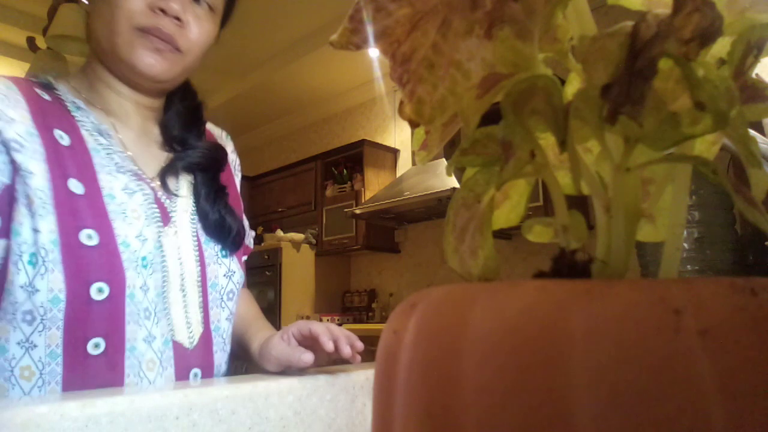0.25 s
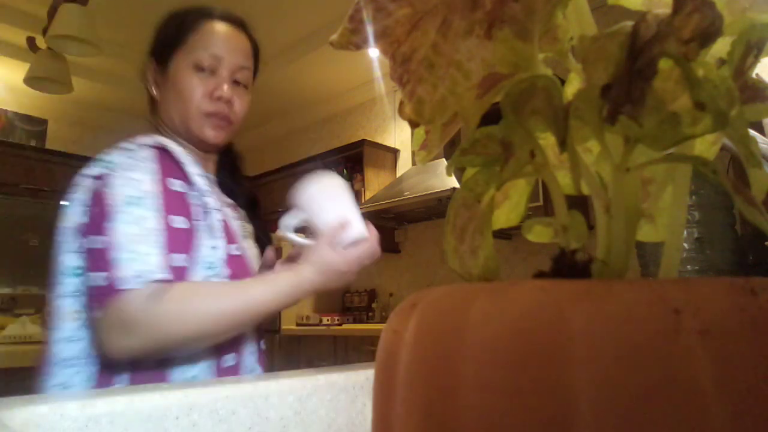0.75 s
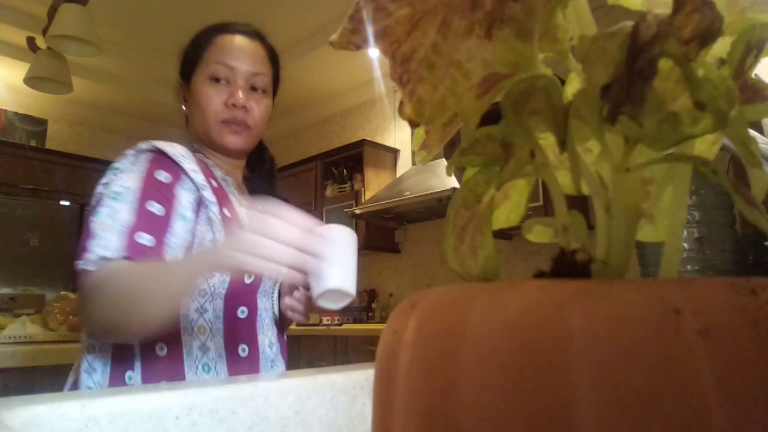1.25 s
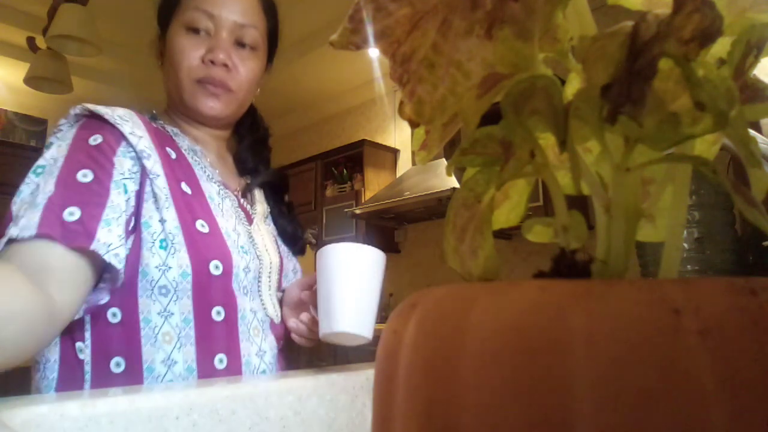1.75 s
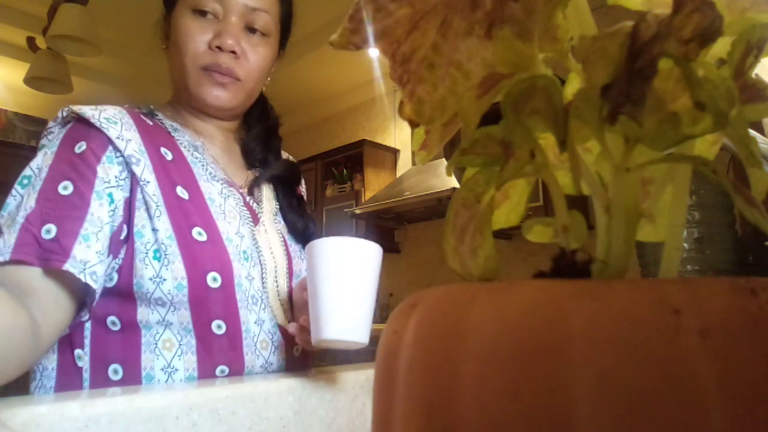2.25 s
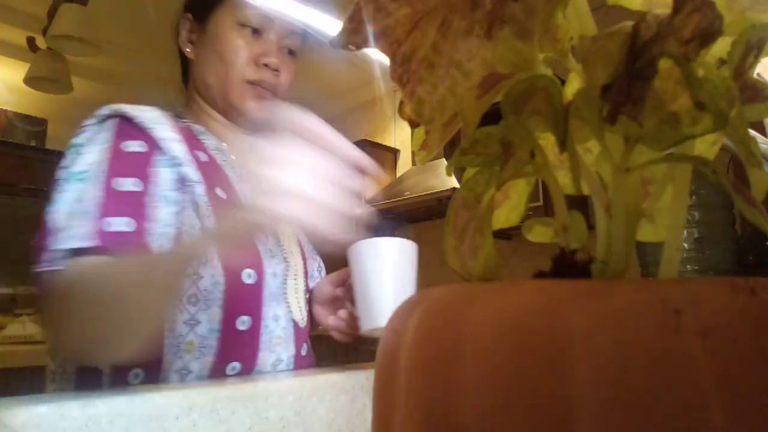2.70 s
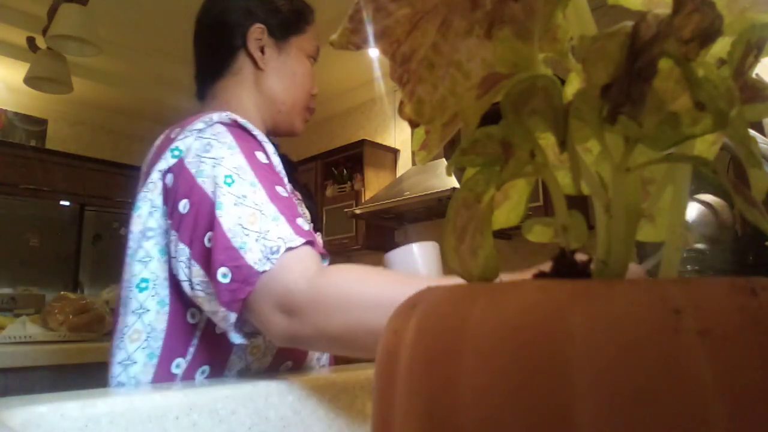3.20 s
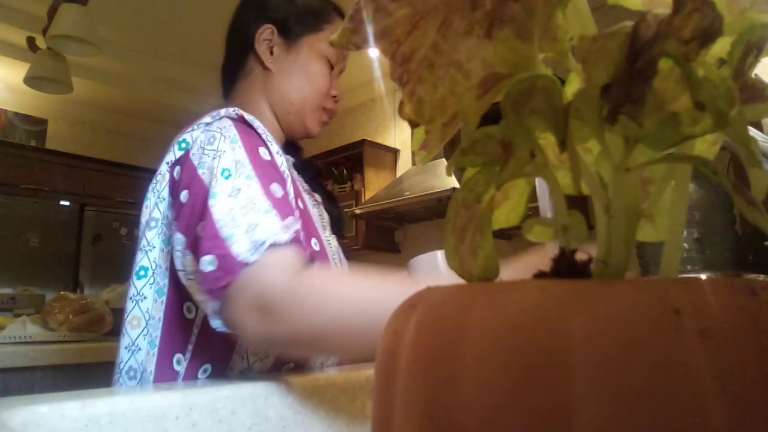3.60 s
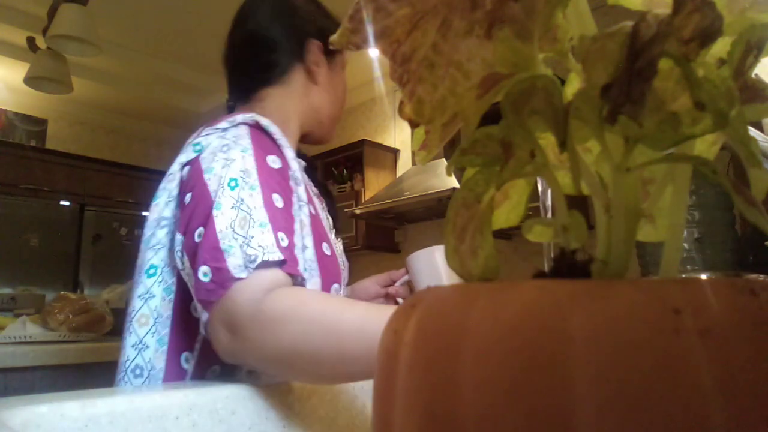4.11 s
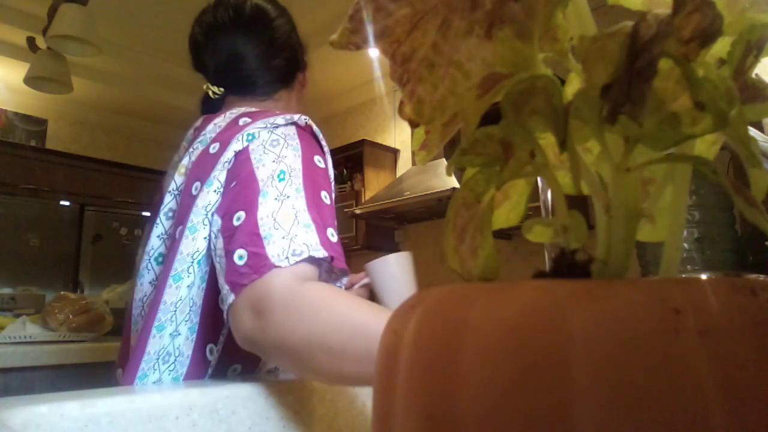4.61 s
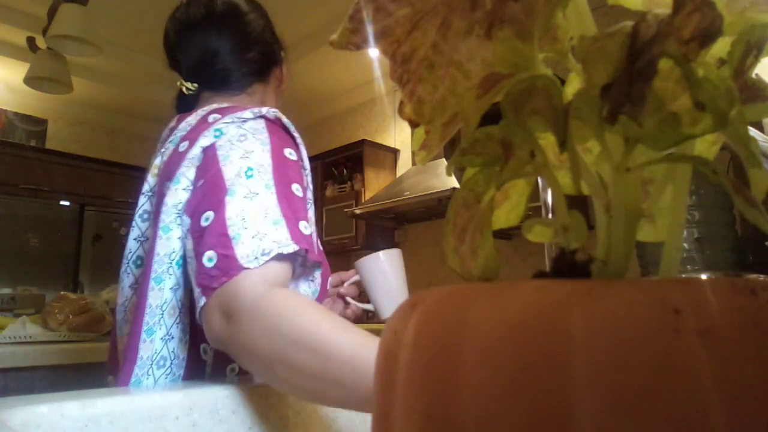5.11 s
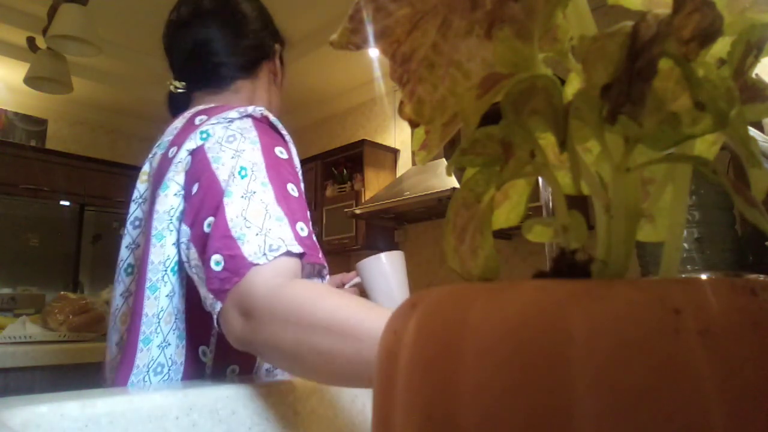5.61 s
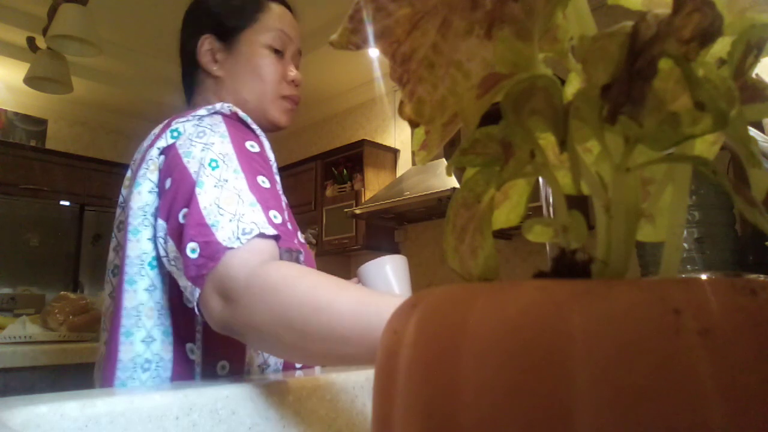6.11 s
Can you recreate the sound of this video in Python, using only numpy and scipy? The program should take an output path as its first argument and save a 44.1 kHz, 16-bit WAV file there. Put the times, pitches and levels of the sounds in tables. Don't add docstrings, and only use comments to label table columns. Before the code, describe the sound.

A quiet kitchen heard close to the counter, with a faint low fridge hum pulsing about five times a second and thin duct air. At 0 s the rounded clunk of a mug just set down dies away within half a second, leaving only hum until about 1.45 s. Then teaspoons chatter against mugs: clipped, gripped metallic clicks to 1.9 s, then louder, freer, brighter ringing, strongest around 2.0-2.15 s, with last clinks near 2.27 s and a short shimmering tail. From 2.5 s soft rubbing begins. At 3.05-3.2 s come low cupboard bumps and dull tub knocks with a slide; firmer knocks land at 3.4 and 3.67 s, with a brief droning drag near 3.55 s. From 3.7 s a packet crinkles, snaps and swishes in irregular squeezes, with scattered dull knocks and counter rubs, notably near 5.63 s, continuing to the end at 6.3 s.

```python
import sys
import numpy as np
from scipy import signal
from scipy.fft import rfft, irfft
from scipy.io import wavfile

SR = 44100
rng = np.random.default_rng(int(sys.argv[2]) if len(sys.argv) > 2 else 0)


def wav_out(sig):
    wavfile.write(sys.argv[1], SR, np.round(np.clip(np.atleast_2d(sig).T, -1, 1) * 32767).astype(np.int16))


def amplitude_ratio(level_db):
    exponent = np.asarray(level_db, float) / 20
    return 10 ** exponent


N = 280035
HZ = np.maximum(np.fft.rfftfreq(N, 1 / SR), 1)


def rms_one(x):
    return x / np.sqrt(np.mean(x ** 2) + 1e-20)


def filtered(x, order, hz, kind):
    return signal.sosfilt(signal.butter(order, hz, kind, fs=SR, output="sos"), x)


def in_time(rows):
    s, *columns = np.transpose(rows)
    t = np.arange(N) / SR
    outside = np.maximum(s[0] - t, 0) + np.maximum(t - s[-1], 0)
    return [np.interp(t, s, c) - 900 * outside for c in columns]


def at_hz(points, hz):
    point_hz, value = np.transpose(points)
    return np.interp(np.log(hz), np.log(point_hz), value)


def coloured(x, spectrum):
    return rms_one(irfft(rfft(x) * amplitude_ratio(at_hz(spectrum, HZ)), N))


def drift(rate):
    knots = rng.standard_normal(400)
    return np.interp(np.arange(N) * rate / SR, np.arange(400), knots)


def random_hits(per_s, spread_db):
    sizes = amplitude_ratio(spread_db * np.minimum(rng.exponential(1, N), 3))
    return sizes * (rng.random(N) < per_s / SR)


def grains(per_s, spread_db):
    flare = signal.lfilter([1], [1, -np.exp(-1 / (0.0025 * SR))], random_hits(per_s, spread_db))
    return rng.standard_normal(N) * (1 + 0.96 * flare)


def patchy(x, patchy_db, rate):
    spectrum, out = rfft(x), 0
    for octave in np.arange(15, 43) / 3:
        band = spectrum * np.clip(1 - 3 * np.abs(np.log2(HZ) - octave), 0, 1)
        if np.any(np.abs(band) > 1):
            flicker = drift(rate) + 0.28 * drift(rate / 3)
            out = out + amplitude_ratio(patchy_db * flicker) * irfft(band, N)
    return rms_one(out)


def add(out, s, x):
    i = round(s * SR)
    out[i:i + len(x)] += x[:N - i]


def struck(modes, stretch, luck=np.zeros(40), scatter_db=0):
    hz, level_db, t60 = np.transpose(modes)[:, :, None]
    t, luck = np.arange(SR // 2) / SR, luck[:len(modes), None]
    hz = hz * (1 + 0.004 * luck[::-1] / stretch)
    decay = amplitude_ratio(level_db + scatter_db * luck - 60 * t / (t60 * stretch))
    build = 1 - np.exp(-hz * t / 0.49)
    return np.sum(decay * np.sin(2 * np.pi * hz * t) * build, axis=0)


def puff(source, s, t60, rise=0.00075):
    t = np.arange(SR // 5) / SR
    snatch = np.resize(source[round(s * SR):], len(t))
    return snatch * amplitude_ratio(-60 * t / t60) * (1 - np.exp(-t / rise))


def chatter(ring, s, white, t60, first=2.4):
    t = np.arange(SR // 16) / SR
    scuff = np.resize(white[round(s * SR):], len(t)) * amplitude_ratio(-60 * (t / t60) ** 2)
    scuff[0] = first * np.sqrt(t60 * SR / 100)
    return signal.fftconvolve(ring, scuff / np.sqrt(np.sum(scuff ** 2)))


def gestures(rows, fall_db_per_s):
    t, main, second = np.arange(N) / SR, 0, 0
    for s, db, rise, extra_db in rows:
        below_db = np.where(t < s, 15 * (s - t) / rise, fall_db_per_s * (t - s))
        gain = amplitude_ratio(db - below_db)
        main = np.maximum(main, gain)
        second = np.maximum(second, amplitude_ratio(extra_db) * gain)
    return main, second


# frequency in Hz, level in dB per Hz.
AIR = [(15, -48.5), (30, -17.5), (45, -18.5), (80, -8), (124, -3.5), (252, -10.5), (525, -15), (1160, -19),
       (1690, -26), (5750, -34.5), (7970, -43), (15300, -44), (16600, -47)]
# frequency in Hz, width in Hz, lift in dB.
WHISTLES = [(549, 36, 18), (1150.5, 44, 16.5)]
# time in seconds, low whistle in dB, high whistle in dB.
DRAUGHT = [(0, -26.5, -29.5), (.8, -21, -21.5), (0.901, -16.5, 2), (1.101, -16, -6.5), (1.4, 3, -8.5),
           (2.4, -2.5, -2.5), (2.9, -5.5, -1.5), (3.6, -2, -2.5), (4.201, -3, -7.5), (4.6, -1, -8),
           (5.2, -7, -1), (5.6, -3.5, -9.5), (6.35, -4.5, -6.5)]
# time in seconds, hum level in dB.
LOAD = [(0, -22), (.2, -6), (.6, 4.5), (1.0, -2.5), (1.3, -0.5), (1.9, 3.5), (2.3, 1.5), (2.7, -5.5),
        (3.3, 5.5), (3.9, -8), (4.2, -3.5), (4.5, 5.5), (4.8, 1), (5.1, -3), (5.4, 3), (5.8, 0), (6.1, 5),
        (6.35, 3)]
AIR_DB, HUM_DB, WEAK_DB = -67.5, -68.5, -6
MAINS_HZ, BEATS_PER_S, IN_STEP_S = 120, 4.74, 1.97
WEAK_EVERY_S, WEAK_AT_S = 6 / BEATS_PER_S, 0.93


def background():
    air = coloured(rng.standard_normal(N), AIR)
    whistles = 0
    for (hz, width, lift_db), draught_db in zip(WHISTLES, in_time(DRAUGHT)):
        lift = amplitude_ratio(lift_db) / (1 + (2 * (HZ - hz) / width) ** 2)
        whistles = whistles + amplitude_ratio(draught_db) * irfft(rfft(air) * lift, N)
    air = patchy(air + whistles, patchy_db=0, rate=13)
    t = np.arange(N) / SR
    turns = 2 * np.pi * (t - IN_STEP_S)
    weak = np.cos(np.pi * (t - WEAK_AT_S) / WEAK_EVERY_S) ** 10
    tones = np.sin(MAINS_HZ * turns) + np.sin((MAINS_HZ - BEATS_PER_S) * turns)
    return amplitude_ratio(AIR_DB) * air + amplitude_ratio(HUM_DB + WEAK_DB * weak + in_time(LOAD)[0]) * tones


# frequency in Hz, level in dB, t60 in seconds.
CLUNK = [(341, -4, 0.29), (379, -5, 0.59), (716, -6, 0.27), (790, -12, 0.52), (1058, -4.5, 0.16),
         (1430, -5.5, 0.12), (1570, -5.5, 0.11), (2030, -20, 0.32), (1960, -26.5, 0.74), (2240, -30, 0.72),
         (2900, -34, .4)]
# frequency in Hz, level in dB per Hz.
CLUNK_TAIL = [(59, -30), (100, -15), (256, -17.5), (367, 1), (410, -13.5), (976, -16.5), (1050, -13),
              (6410, -40.5), (9000, -66), (11700, -100), (19800, -120)]
CLUNK_DB, CLUNK_TAIL_DB, CLUNK_T60_S = -34, -41, 0.52


def clunk():
    decay_db = -60 * np.arange(N) / SR / CLUNK_T60_S
    out = amplitude_ratio(CLUNK_TAIL_DB + decay_db) * coloured(rng.standard_normal(N), CLUNK_TAIL)
    add(out, 0, amplitude_ratio(CLUNK_DB) * struck(CLUNK, 0.82))
    return out


# frequency in Hz, level in dB, t60 in seconds.
LOW_RING = [(2870, -13.5, 0.06), (2620, 3.5, 0.028), (2550, -6, 0.038)]
MIDDLE_RING = [(4100, -3.5, 0.034), (4200, 6, 0.024), (4290, 1, 0.065), (4300, -6.5, .03)]
MAIN_RING = [(5530, -10.5, 0.052), (6000, -8.5, 0.04), (5919, 6, 0.092), (6010, 1.5, 0.04),
             (5710, -10, .04), (6074, 7, 0.048), (6690, -2.5, 0.057)]
SIZZLE = [(10130, -8.5, 0.05), (10380, -4.5, 0.064), (10940, -0.5, 0.03), (12200, -8.5, 0.044),
          (11500, -6.5, 0.065), (12720, -2, 0.026), (13600, -9, .03), (14520, -3.5, .06),
          (15100, -0.5, .03), (15400, -3.5, 0.032), (15740, -9.5, 0.051)]
# frequency in Hz, level in dB, t60 in seconds.
RING_OUT = [(2660, -34, 0.71), (2580, -34.5, 0.68), (4250, -39, 0.67), (5420, -33.5, .7),
            (5620, -36.5, .45), (5700, -38.5, .45), (6140, -31, 0.7), (5770, -33, 1), (6331, -37, .5),
            (6875, -35, 0.7), (4270, -38.5, 0.5), (14525, -43, .2)]
# frequency in Hz, level in dB per Hz.
CRACK = [(180, -60.5), (520, -33), (700, -43.5), (1000, -22.5), (1890, -14), (3180, -0.5), (4160, -21.5),
         (4750, -6.5), (6110, 3), (8260, -29.5), (10600, -12), (13400, -20), (15400, -7), (16400, -31)]
# frequency in Hz, level in dB per Hz.
THUD = [(150, -20), (300, -6.5), (520, -5), (680, -8.5), (900, 1.5), (1300, -2), (1700, -6), (2200, -4.5),
        (3000, -19.5), (5000, -61)]
# start in seconds, peak in dB,
# spot from -1 (mug) to 1 (spoon), scuff t60 in seconds.
GRIPPED = [(1.4475, -34, .3, .01), (1.4507, -23.5, 0.4, 0.024), (1.466, -42.5, 1.23, 0.053),
           (1.4965, -21, 0.3, 0.016), (1.5494, -16, 0.31, .012), (1.628, -14.5, 0.3, 0.025),
           (1.6385, -23.5, 1.34, 0.032), (1.6544, -40.5, 0.61, 0.011), (1.704, -19, .2, 0.031),
           (1.747, -46.5, 0.1, .01), (1.7611, -18, 0.68, 0.036), (1.7893, -25, -0.42, 0.057),
           (1.812, -45, -.1, 0.011), (1.8386, -22, 0.036, 0.016), (1.847, -23, -0.2, 0.02),
           (1.856, -23.5, -.2, .05), (1.8845, -25.5, 0.27, 0.023), (1.906, -29.5, -1.3, 0.12)]
# start in seconds, peak in dB,
# spot from -1 (mug) to 1 (spoon), scuff t60 in seconds.
LOOSE = [(1.9554, -23, -0.05, 0.11), (1.9907, -20.5, 0.35, 0.047), (1.9997, -18.5, -1.5, 0.019),
         (2.0035, -18.5, -0.54, 0.024), (2.0251, -9.5, -1.3, 0.064), (2.0344, -14, -0.9, 0.011),
         (2.0414, -34, -.5, 0.022), (2.0565, -19, -1, 0.074), (2.1042, -18.5, 0.05, 0.013),
         (2.1117, -10, 0.35, 0.018), (2.1292, -24, 0.9, 0.043), (2.138, -22.5, 0.28, 0.028),
         (2.255, -26.5, -0.28, 0.048), (2.2711, -25.5, 0.5, 0.046)]
# start in
# seconds, peak in dB, frequency in Hz, t60 in seconds.
PINGS = [(1.5505, -5.5, 4200, 0.022), (1.5496, -19, 3800, 0.02), (1.5491, -19.5, 4650, 0.014),
         (1.552, -24.5, 6250, 0.022), (1.554, -30.5, 7260, 0.026), (1.55, -32, 2600, 0.029),
         (1.549, -33, 1310, .02), (1.551, -39, 550, 0.033), (1.56, -43.5, 4200, 0.12),
         (1.6385, -19, 3950, 0.022), (1.707, -32.5, 4140, 0.062), (2.0326, -8.5, 5940, .03),
         (2.04, -15.5, 5950, .06), (1.628, -25, 15400, .03), (1.635, -19.5, 6460, 0.02),
         (1.655, -33.5, 15200, 0.059), (1.706, -36.5, 12500, 0.051), (1.7594, -18, 4440, 0.037),
         (1.786, -32, 4640, 0.064), (1.81, -32.5, 4480, .04), (1.813, -46.5, 1430, 0.04),
         (1.842, -32, 2840, .04), (1.859, -36, 2890, .06), (1.957, -29.5, 6330, .04),
         (1.992, -41, 1620, .03), (2.026, -39, 290, 0.05), (2.028, -32.5, 14520, .15),
         (2.106, -29.5, 14520, .25), (2.0331, -17, 2586, 0.079), (2.058, -28, 6900, 0.074),
         (2.056, -32.5, 7540, .05), (2.057, -32, 5130, .08), (2.1115, -15, 4185, .06),
         (2.111, -19, 6920, 0.12), (2.112, -44, 1518, .06), (2.1249, -18, 4154, .06),
         (2.0034, -16, 5980, 0.028), (1.496, -31, 2660, .015), (3.053, -43, 2900, 0.031),
         (3.053, -52.5, 7420, .03), (3.112, -58, 4200, .03), (3.301, -60.5, 6060, .3),
         (3.404, -67, 7300, 0.37), (3.41, -60, 6100, 0.24), (3.565, -53.5, 7230, .12),
         (3.566, -57.5, 6100, 0.13), (3.67, -28, 3240, .025), (3.673, -33, 5100, 0.026),
         (3.71, -43, 6100, .03), (3.885, -57, 5960, .02)]
# time in seconds, level in dB.
JINGLE = [
    (1.44, -67.5),
    (1.498, -88.5),
    (1.618, -60.5),
    (1.856, -51),
    (1.964, -48),
    (2.14, -32.5),
    (2.3, -42.5),
    (2.42, -71),
    (2.55, -78.5),
]
LOW_DB, LOW_DB_PER_SPOT = -14.5, -9.5
MIDDLE_DB, MIDDLE_DB_PER_SPOT = -9, 18
SIZZLE_DB, SIZZLE_DB_PER_SPOT = -3, 4
GRIP_ENDS_S, GRIP_DAMPING = 1.95, 0.42
GRIPPED_RING_OUT_DB, LOOSE_RING_OUT_DB = 7.5, 12.5
DEPTH_HZ, DEPTH_DB, DEPTH_PER_DB = 1880, -3.5, 0.14


def spoons():
    out, white = np.zeros(N), rng.standard_normal(N)
    crack, deep = coloured(white, CRACK), coloured(white[::-1], THUD)
    bright = filtered(crack, 2, DEPTH_HZ, "high")
    for (s, db, spot, scuff), luck in zip(GRIPPED + LOOSE, rng.standard_normal((40, 12))):
        gripped = s < GRIP_ENDS_S
        stretch = GRIP_DAMPING if gripped else 1
        families = ((MAIN_RING, 0),
                    (LOW_RING, LOW_DB + LOW_DB_PER_SPOT * spot),
                    (MIDDLE_RING, MIDDLE_DB + MIDDLE_DB_PER_SPOT * spot),
                    (SIZZLE, SIZZLE_DB + SIZZLE_DB_PER_SPOT * spot),
                    (RING_OUT, GRIPPED_RING_OUT_DB if gripped else LOOSE_RING_OUT_DB))
        rings = [amplitude_ratio(level_db) * chatter(struck(modes, stretch, luck), s, white, scuff)
                 for modes, level_db in families]
        add(out, s, amplitude_ratio(db - 2.5) * sum(rings) / np.abs(rings[0]).max())
        impact = bright + amplitude_ratio(DEPTH_DB + DEPTH_PER_DB * (db + 13)) * deep
        add(out, s, amplitude_ratio(db - 19) * puff(impact, s, t60=1.5 * scuff + 0.021))
    for s, db, hz, t60 in PINGS:
        ring = struck([(hz, 0, t60), (0.94 * hz, -8, t60)], 0.93)
        ping = chatter(ring, s, white, t60=0.012, first=5.7)
        add(out, s, amplitude_ratio(db) * ping / np.abs(ping).max())
    body = struck(LOW_RING + MIDDLE_RING + MAIN_RING + SIZZLE, 0.84)
    ticks = rms_one(signal.fftconvolve(grains(per_s=400, spread_db=17), body)[:N])
    sliding = amplitude_ratio(in_time(JINGLE)[0] - 8.5) * (0.32 * ticks + crack + 0.13 * deep)
    return filtered(out, 2, 170, "high") + sliding


# start in seconds, peak in dB, frequency in Hz.
THUMPS = [
    (3.056, -37, 154),
    (3.117, -36.5, 198),
    (3.159, -37.5, 105),
    (3.198, -50, 111),
    (3.427, -44.5, 121),
    (3.996, -49, 115),
    (2.027, -49.5, 199),
]


def thumps():
    out, white = np.zeros(N), rng.standard_normal(N)
    for s, db, hz in THUMPS:
        panel = struck([(hz, 0, 0.09), (1.4 * hz, -4, 0.07)], 0.92)
        bump = chatter(panel, s, white, t60=0.35, first=0.38)
        add(out, s, amplitude_ratio(db - 5) * bump / np.abs(bump).max())
    return out


# frequency in Hz, level in dB per Hz.
RUSTLE = [(1410, -24.5), (2050, -14), (2500, -6), (3000, -3), (3610, -6.5), (4300, -8.5), (6250, -2.5),
          (6700, -3), (8500, -22), (11000, -29), (18700, -120)]


def creases(per_s, cycles):
    sizes = random_hits(per_s, spread_db=2)
    dealt, out = rng.integers(0, 16, N), 0
    for k, hz in enumerate(np.geomspace(2500, 7200, 16)):
        r, w = amplitude_ratio(-60 * hz / (cycles * SR)), 2 * np.pi * hz / SR
        pops = sizes * (dealt == k) + 1e-18
        ring = signal.lfilter([0, np.sin(w)], [1, -2 * r * np.cos(w), r * r], pops)
        out = out + amplitude_ratio(at_hz(RUSTLE, hz)) * ring
    return rms_one(out)


# frequency in Hz, level in dB per Hz.
RUB = [(88, -37), (150, 1), (236, -19.5), (326, -2.5), (452, -2.5), (513, 0.5), (576, -4.5), (700, -13.5),
       (800, -7.5), (940, -3.5), (1080, -8), (1300, -25.5), (1690, -53.5), (2860, -120)]
# frequency in Hz, level in dB per Hz.
SCUFF = [(710, -14.5), (1200, 0), (1520, 0), (1630, -0.5), (2500, -8.5), (3250, -17.5), (5500, -120)]
# frequency in Hz, level in dB per Hz.
CRACKLE = [(4590, -6), (7800, -6.5), (9060, -8), (9970, -4.5), (13400, -13), (15100, 6.5), (16100, -32),
           (16400, -6.5)]
# loudest moment in seconds, level in dB, rise in seconds, grit in dB.
STROKES = [(2.6, -50, 0.14, -9), (3.07, -52.5, 0.092, -7), (3.17, -44.5, 0.18, -3.5), (3.37, -47, 0.14, -1),
           (3.52, -43, 0.37, -7), (3.69, -45.5, 0.022, 6), (4.3, -48.5, 0.13, -1), (4.7, -56, 0.14, -22),
           (4.93, -59.5, 0.17, 6), (5.11, -49, 0.12, -11.5), (5.27, -50, 0.043, -9.5),
           (5.65, -49.5, 0.039, -8), (5.86, -49.5, 0.089, -18), (6.03, -52, 0.066, -32),
           (6.19, -48.5, 0.074, -9), (6.34, -42.5, 0.094, -29)]
# loudest moment in seconds, level in dB, rise in seconds,
# fine crackle in dB.
SQUEEZES = [(2.55, -77.5, .1, -23.5), (3.15, -68, 0.038, -14), (3.24, -71, 0.11, -28),
            (3.36, -59.5, 0.14, -19), (3.69, -51, 0.019, -3.5), (3.86, -54, 0.083, -7.5),
            (4.21, -53.5, 0.061, -10), (4.3, -60.5, 0.11, -4.5), (4.56, -62, 0.037, -20),
            (4.76, -50.5, 0.069, -21), (4.94, -55, 0.21, 0), (5.08, -56, 0.13, -0.5),
            (5.27, -56, 0.66, -21), (5.42, -54.5, 0.23, -30), (5.5, -55, 0.068, -28.5),
            (5.63, -51.5, 0.027, -14), (5.87, -60, .06, -7), (6.02, -57.5, 0.18, -20),
            (6.18, -55.5, 0.16, -19), (6.3, -55.5, 0.28, -11)]
# time in seconds,
# lower rustle over the upper in dB.
FOLDS = [(3.0, -3.5), (3.3, 7), (3.7, 7), (4.0, 4), (4.25, 7), (4.4, -1), (4.5, 2.5), (4.68, -9),
         (4.75, 7.5), (5.0, 0), (5.2, -0.5), (5.33, -7.5), (5.45, 14), (5.57, 4), (5.7, 1.5), (5.85, -3),
         (6.05, -8.5), (6.35, 3)]
# time in seconds, frequency in Hz, level in dB.
DRAG = [
    (3.44, 376.6, -58),
    (3.554, 374, -43.5),
    (3.6, 420, -68),
]
# loudest moment in seconds, level in dB, rise in seconds, bright edge in dB.
SLIDES = [
    (3.15, -56, 0.063, -13.5),
    (3.354, -68, 0.036, -1),
]
SLIDE_HZ, EDGE_HZ = (3950, 5500), (5160, 7000)
FOLD_SPLIT_HZ = 4220


def handling():
    press, grit = gestures(STROKES, fall_db_per_s=73.5)
    squeeze, fine = gestures(SQUEEZES, fall_db_per_s=49)
    rub = patchy(coloured(grains(per_s=36, spread_db=1.5), RUB), patchy_db=3.5, rate=14)
    scuff = coloured(grains(per_s=15, spread_db=-5), SCUFF)
    rustle = patchy(coloured(grains(per_s=50, spread_db=3), RUSTLE), patchy_db=3.5, rate=20)
    rustle = rustle + 0.19 * creases(per_s=200, cycles=74)
    crackle = patchy(coloured(grains(per_s=25, spread_db=3.2), CRACKLE), patchy_db=3, rate=12)
    lower = filtered(rustle, 4, FOLD_SPLIT_HZ, "low")
    upper = filtered(rustle, 4, FOLD_SPLIT_HZ, "high")
    folds_db = np.clip(in_time(FOLDS)[0], -12, 12)
    rustle = amplitude_ratio(folds_db / 2) * lower + amplitude_ratio(-folds_db / 2) * upper
    drag_hz, drag_db = in_time(DRAG)
    drag = amplitude_ratio(drag_db + 2.5) * np.sin(2 * np.pi * np.cumsum(drag_hz) / SR)
    slide, edge = gestures(SLIDES, fall_db_per_s=98)
    friction = grains(per_s=88.3, spread_db=0.5)
    lid = slide * rms_one(filtered(friction, 2, SLIDE_HZ, "band"))
    lid = lid + edge * rms_one(filtered(friction, 2, EDGE_HZ, "band"))
    counter = amplitude_ratio(-7) * press * rub + amplitude_ratio(-8.5) * grit * scuff
    packet = amplitude_ratio(-2) * squeeze * rustle + amplitude_ratio(-8) * fine * crackle
    return lid + counter + packet + drag


# start in seconds, peak in dB, frequency in Hz.
CRINKLES = [(3.052, -42.5, 1966), (3.1438, -43, 1570), (3.4097, -26.5, 1560), (3.5675, -47.5, 6670),
            (3.6712, -19.5, 1706), (3.8445, -41, 3500), (4.015, -44, 2940), (4.1955, -40, 2900),
            (4.3777, -35.5, 2880), (4.5166, -37, 5440), (4.752, -35, 4230), (4.819, -33, 3020),
            (4.873, -32.5, 1940), (4.9283, -26.5, 2970), (5.046, -35, 5700), (5.1059, -33, 2960),
            (5.1783, -34.5, 3600), (5.2227, -40, 6200), (5.3988, -31, 3180), (5.418, -40.5, 4860),
            (5.4816, -38, 6500), (5.598, -34, 5430), (5.6295, -23.5, 2550), (5.689, -35, 3390),
            (5.7467, -46, 3670), (5.8657, -37, 3380), (5.973, -36.5, 3330), (6.1427, -36, 5000),
            (6.1672, -27.5, 3520), (6.232, -40, 3530), (3.9019, -54, 3550), (3.9408, -48.5, 3160),
            (4.287, -51, 5500), (4.3, -41.5, 6000), (4.314, -57, 3000), (4.6123, -42.5, 5250),
            (4.71, -46.5, 2980), (4.9283, -35.5, 1600), (4.955, -52, 3250), (5.048, -40, 2810),
            (5.065, -44, 3520), (5.15, -45, 4600), (5.3476, -45, 4900), (5.374, -42, 5070),
            (5.4643, -36, 3520), (5.5162, -46, 2900), (5.598, -41, 3470), (5.6669, -35, 2300),
            (5.8305, -45.5, 3330), (5.8879, -55, 3500), (5.9203, -47, 4680), (5.975, -43.5, 5950),
            (6.0141, -43, 5200), (6.0719, -49.5, 2860), (6.1198, -46, 5000), (6.1538, -34, 4730),
            (6.176, -37, 3400), (6.193, -40, 3300), (6.2176, -42.5, 2560), (6.285, -39.5, 5930)]
# start in seconds, level in dB.
SWISHES = [(3.121, -69), (3.311, -68), (3.705, -60.5), (3.84, -59.5), (4.029, -66.5), (4.26, -60),
           (4.661, -65.5), (4.81, -61.5), (4.924, -53), (5.046, -65.5), (5.2233, -61), (5.267, -57.5),
           (5.35, -63), (5.56, -64), (5.689, -63), (5.975, -58.5), (6.07, -63), (6.17, -57.5)]


def crinkles():
    out, white = np.zeros(N), rng.standard_normal(N)
    film = coloured(white, CRACKLE)
    for s, db, hz in CRINKLES:
        wide = 1.097 + 0.03 * max(db + 38, 0)
        snap = filtered(puff(white, s, t60=0.041, rise=0.00023), 2, [hz / wide, hz * wide], "band")
        ping = struck([(hz, -4, 0.022)], 0.55)[:len(snap)]
        add(out, s, amplitude_ratio(db - 4) * (snap / np.abs(snap).max() + ping))
    for s, db in SWISHES:
        add(out, s, amplitude_ratio(db) * puff(film, s, t60=0.3, rise=0.0022))
    return out


# start in seconds, peak in dB, frequency in Hz.
KNOCKS = [(3.054, -30, 583), (3.065, -57, 647), (3.113, -34, 532), (3.15, -51, 485), (3.304, -33.5, 543),
          (6.328, -40, 945), (3.41, -23, 584), (3.672, -24.5, 355), (4.652, -40.5, 1020),
          (5.077, -34.5, 560), (5.1, -36.5, 970), (5.251, -37.5, 513), (5.636, -28.5, 319),
          (5.643, -38, 907), (5.734, -34.5, 366), (5.825, -35.5, 432), (5.994, -40, 880), (5.996, -35, 410),
          (6.167, -37, 554), (6.188, -38.5, 407), (6.291, -53, 536), (6.304, -31, 310), (6.331, -32.5, 330)]
# frequency in Hz, level in dB, t60 in seconds.
COUNTER = [(151, -36, .1), (336, -10, 0.26), (380.8, -8, 0.47), (515, -6, 0.19), (663, -1, 0.064),
           (858, -12, 0.11), (915, -3, 0.077), (1010, -2, 0.096), (1560, 1, 0.013), (1760, -8, 0.046)]


def knocks():
    out, white = np.zeros(N), rng.standard_normal(N)
    for (s, db, hz), luck in zip(KNOCKS, rng.standard_normal((len(KNOCKS), 12))):
        near = [(f, g - 6 * abs(np.log2(f / hz)), t60) for f, g, t60 in COUNTER]
        tub = struck([(hz, -1.5, 0.09), (1.07 * hz, -6, 0.07)], 1)
        counter = struck(near, 1.18, luck, scatter_db=3.5)
        add(out, s, amplitude_ratio(db - 11) * chatter(tub + counter, s, white, t60=0.03, first=1.9))
    return out


# frequency in Hz, t60 in seconds.
ROOM = [(200, 0.2), (1000, 1), (2600, .7), (4000, 0.31), (6000, 0.57), (9000, 0.45), (16000, 0.24)]
ROOM_DB = -16.5


def kitchen(x):
    t, tail = np.arange(SR) / SR, 0
    white, hz = rfft(rng.standard_normal(SR)), np.arange(1, SR // 2 + 2)
    for octave in np.arange(6, 15):
        share = np.clip(1 - np.abs(np.log2(hz) - octave), 0, 1)
        tail = tail + irfft(white * share) * amplitude_ratio(-60 * t / at_hz(ROOM, 2.0 ** octave))
    tail = tail * (1 - np.exp(-t / 0.0038))
    return amplitude_ratio(ROOM_DB) * signal.fftconvolve(x, tail / np.sqrt(np.sum(tail ** 2)))[:N]


def scene():
    blows = filtered(spoons() + crinkles() + knocks(), 2, 260, "high")
    soft = thumps() + clunk() + handling() + background()
    return (blows + kitchen(blows) + soft)[None]


def band_limit(x):
    return signal.sosfilt(signal.butter(12, 17130, fs=SR, output="sos"), x)


def record(dry):
    no_rumble = filtered(dry, 2, 45, "high")
    steep_top = signal.cheby2(12, 42, 16150, fs=SR, output="sos")
    return band_limit(signal.sosfilt(steep_top, no_rumble))


dry = scene()
out = record(dry)
wav_out(out)
```